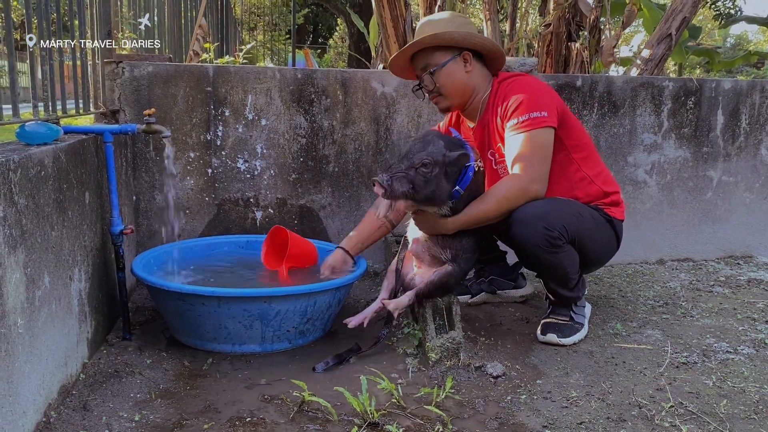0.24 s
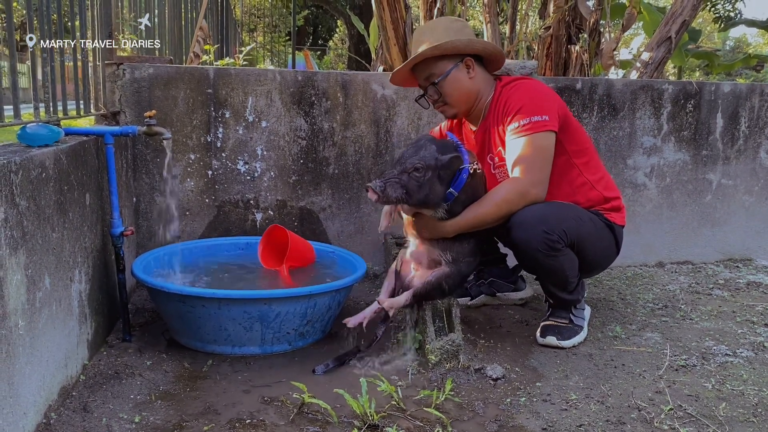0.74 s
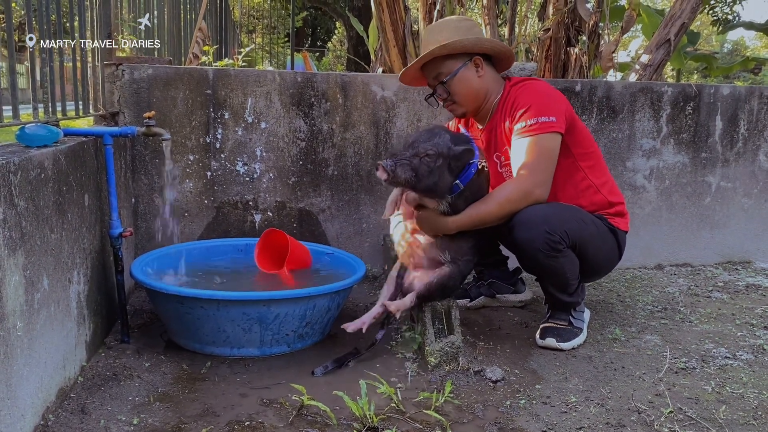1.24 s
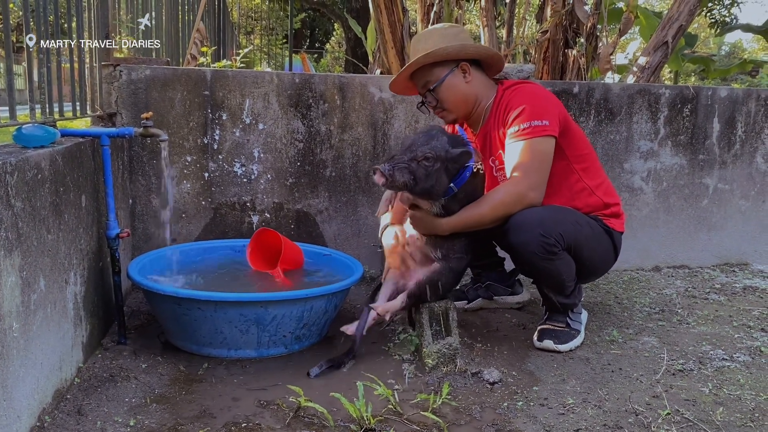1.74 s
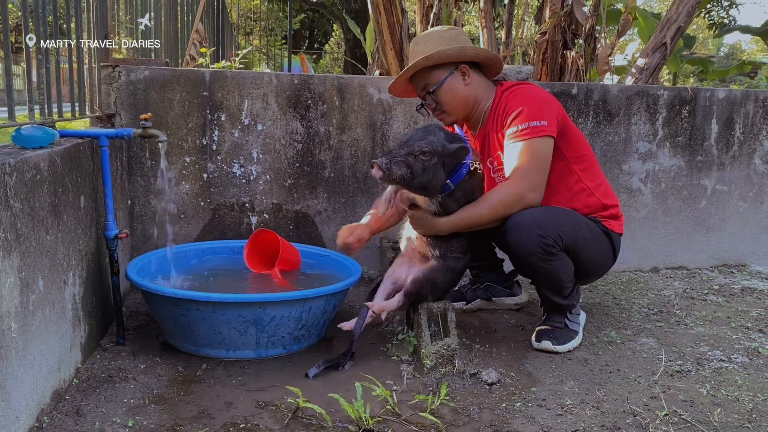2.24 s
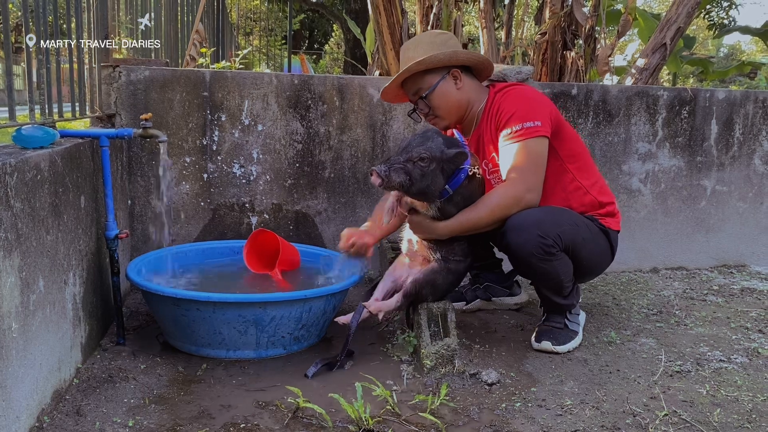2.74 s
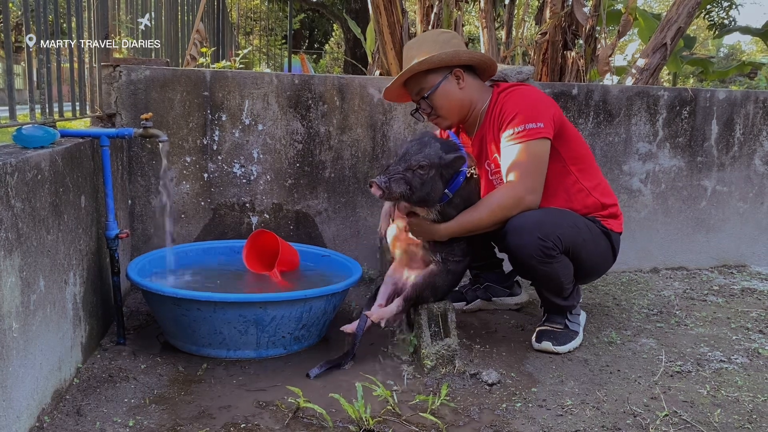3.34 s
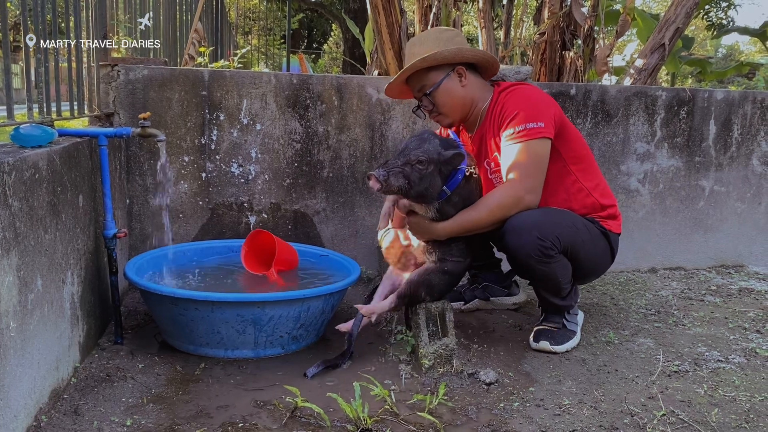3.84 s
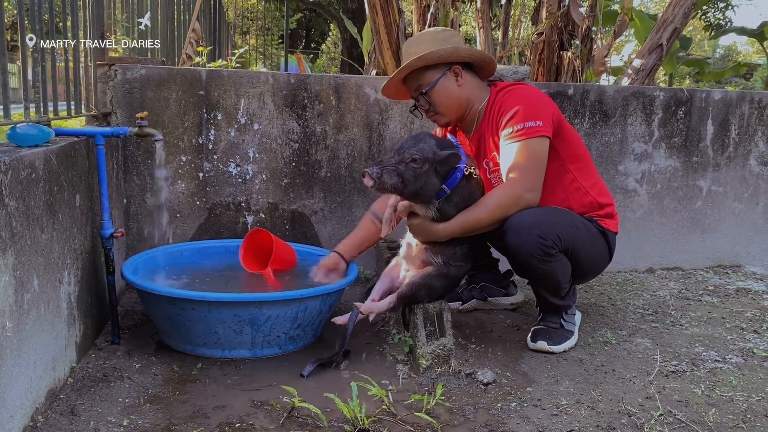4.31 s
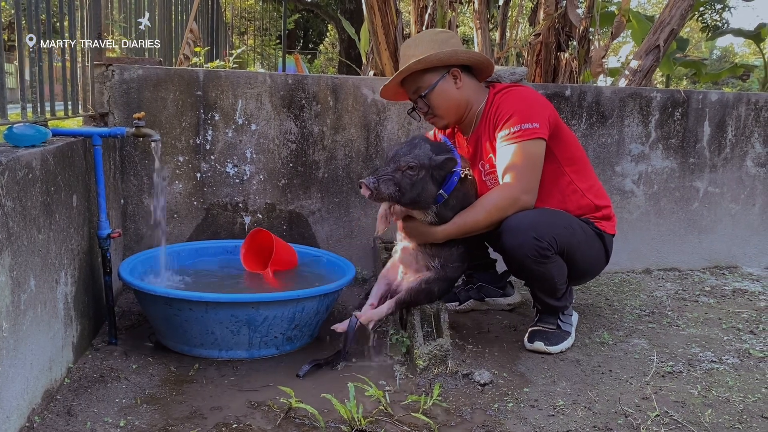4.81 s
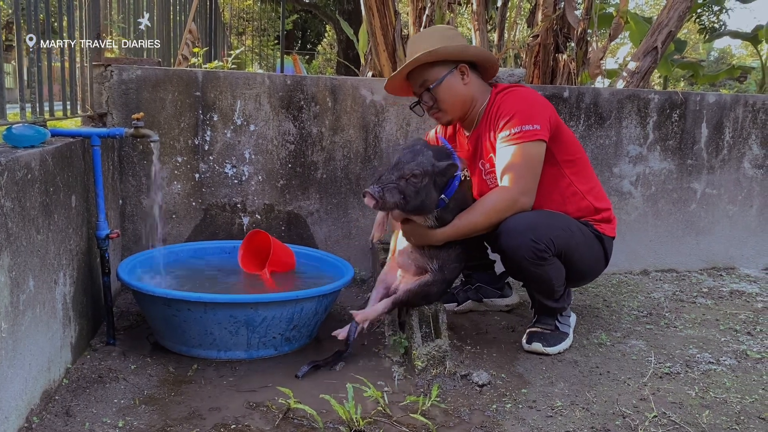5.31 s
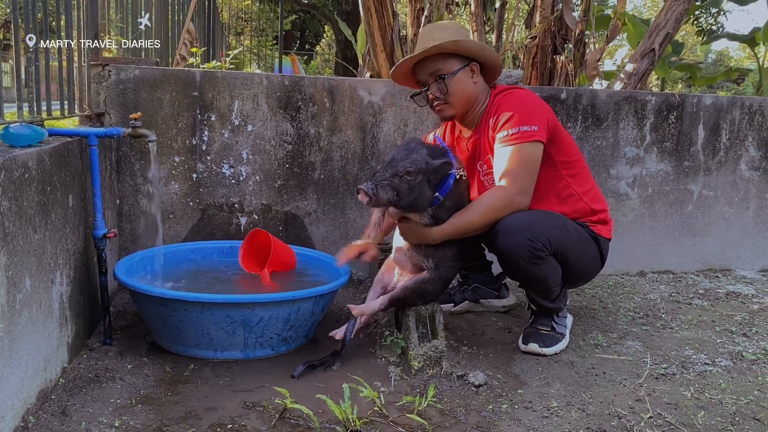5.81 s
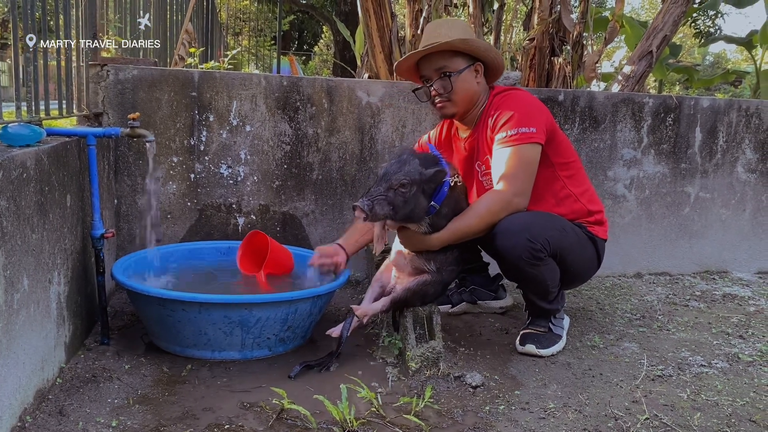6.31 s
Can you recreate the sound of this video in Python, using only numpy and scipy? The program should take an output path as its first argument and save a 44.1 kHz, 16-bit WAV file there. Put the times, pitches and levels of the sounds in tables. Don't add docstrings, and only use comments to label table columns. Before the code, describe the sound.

Shrill, fluttering piglet cries rise, crack and sink over running tap water, wet splashes and bubbling plops, with faint traffic rumbling behind.

```python
import sys
import numpy as np
from scipy import signal
from scipy.fft import rfft, irfft, next_fast_len
from scipy.io import wavfile
from scipy.ndimage import uniform_filter1d, map_coordinates

SR = 44100
rng = np.random.default_rng(int(sys.argv[2]) if len(sys.argv) > 2 else 0)


def dump(signal):
    limited = np.clip(np.atleast_2d(signal).T, -1, 1)
    pcm = np.round(limited * 32767).astype(np.int16)
    wavfile.write(sys.argv[1], SR, pcm)


def how_loud(loudness_db):
    steps = np.asarray(loudness_db, float) / 20
    return 10 ** steps


N = 289296
CLOCK = np.arange(N) / SR


def unit(x):
    return x / np.sqrt(np.mean(x ** 2) + 1e-20)


def noise():
    return rng.standard_normal(N)


def along(points, hz):
    f, v = np.transpose(points)
    return np.interp(np.log(hz + 1), np.log(f + 1), v)


def curves(rows):
    s, *columns = np.transpose(rows)
    return [np.interp(CLOCK, s, column) for column in columns]


def wobble(rate):
    return map_coordinates(rng.standard_normal(int(N * rate / SR) + 4), [np.arange(N) * rate / SR])


def between(start, end, edge_s):
    return np.clip(np.minimum(CLOCK - start, end - CLOCK) / edge_s, 0, 1)


def filtered(x, response):
    m = next_fast_len(N + SR // 2)
    return irfft(rfft(x, m) * response(np.fft.rfftfreq(m, 1 / SR)), m)[..., :N]


def resonance(hz, centre, width):
    return 1j * hz * width / (centre * centre - hz * hz + 1j * hz * width)


def resonant(x, modes):
    def response(hz):
        return sum((-1) ** k * how_loud(db) * resonance(hz, centre, width)
                   for k, (centre, width, db) in enumerate(modes))
    return filtered(x, response)


def effort():
    # (time [s], pitch [Hz], whistle [dB], throat rasp [dB], fold pressing [dB])
    fading = [(0.0, 1440, -37, -32, 3), (0.04, 1330, -32.5, -46.5, 0.5), (0.065, 1255, -29.5, -37, -2),
              (0.125, 1190, -39.5, -38, -5), (0.165, 1150, -54, -33.5, -20), (0.25, 1140, -52, -44, -15),
              (0.335, 1140, -49, -35, -16)]
    revived = [(0.37, 1190, -35.5, -39.5, -2.5), (0.424, 1295, -31, -39, 0.5), (0.452, 1147, -47, -36, -6),
               (0.491, 1080, -48, -34, 4), (0.51, 1100, -73, -44.5, -4), (0.584, 1186, -65, -38.5, -6),
               (0.61, 1184, -58, -53.5, -9), (0.66, 1189, -59, -51, -9)]
    onset = [(1.05, 1145, -75, -54, -14), (1.138, 1150, -58, -59.5, -10), (1.162, 1223, -43.5, -49, 1),
             (1.185, 1557, -30, -42, -10)]
    held = [(1.21, 1684, -21, -46, -15), (1.29, 1722, -19, -43.5, -13), (1.326, 1642, -23.5, -41, -13),
            (1.345, 1736, -19, -45, -8), (1.53, 1846, -22, -51, -4), (1.58, 1768, -21.5, -43, -1.5),
            (1.71, 1844, -21, -41.5, -6), (1.852, 1806, -20.5, -43.5, -6.5)]
    strained = [(1.988, 1800, -21.5, -40.5, -5.5), (2.131, 1750, -23.5, -38.5, -1.5),
                (2.25, 1790, -23.5, -40.5, -3), (2.351, 1677, -24.5, -38, 1), (2.449, 1575, -25, -40, -2.5)]
    sinking = [(2.6, 1500, -26.5, -40, -2.5), (2.69, 1398, -30.5, -36.5, -2.5), (2.751, 1240, -34, -39, 5),
               (2.83, 899, -52, -39.5, 7), (2.955, 1011, -44, -40, 7.5), (2.974, 1217, -38, -44, 5.5)]
    renewed = [(3.0, 1380, -26, -34, -2.5), (3.07, 1406, -28.5, -33, -1), (3.116, 1340, -28, -36, -3),
               (3.164, 1428, -28.5, -31.5, 1.5), (3.249, 1340, -28.5, -38.5, -1.5),
               (3.286, 1369, -24.5, -32.5, -2), (3.306, 1264, -30.5, -36, -1),
               (3.385, 1159, -39.5, -37, 8.5)]
    hoarse = [(3.4, 1077, -36, -30.5, -4), (3.43, 1169, -36, -34.5, 6.5), (3.5, 1257, -29, -36, -3),
              (3.549, 1204, -38, -34.5, -1.5), (3.69, 1199, -32, -37, 3), (3.739, 1182, -53, -37, -4),
              (3.799, 1175, -45, -38.5, -26)]
    rising = [(4.36, 1133, -65, -53, 6), (4.51, 1128, -55.5, -47, -17), (4.545, 1150, -49, -39.5, -10),
              (4.56, 1135, -37, -41, -4), (4.6, 1102, -40.5, -47, 2.5), (4.7, 1109, -44, -47.5, -1.5)]
    swelling = [(4.723, 1335, -32, -39, -15), (4.8, 1386, -22, -38, -10), (4.9, 1496, -20, -35, -5.5),
                (5.001, 1517, -23, -36, -3), (5.101, 1499, -23.5, -38, -2.5),
                (5.2, 1393, -24.5, -33.5, -7.5), (5.252, 1298, -25, -34.5, -4.5)]
    wavering = [(5.302, 1461, -20, -31, -4.5), (5.468, 1796, -19.5, -35, -7.5),
                (5.562, 1678, -23, -34.5, -7.5), (5.575, 1489, -20, -32, -6),
                (5.652, 1364, -20.5, -32.5, -4.5), (5.728, 1638, -18, -30.5, -7),
                (5.792, 1474, -22, -32, -1), (5.865, 1748, -18, -38.5, -7.5), (5.94, 1670, -22.5, -32, -8)]
    dying = [(5.958, 1429, -22, -32.5, -6), (6.06, 1238, -29, -34.5, 0.5), (6.103, 866, -45.5, -31, 6),
             (6.16, 850, -47, -71, -16)]
    # (start [s], end [s])
    breaths = [
        (-1, .64),
        (1.055, 3.835),
        (4.36, 6.15),
    ]
    phrases = (fading + revived + onset + held + strained + sinking
               + renewed + hoarse + rising + swelling + wavering + dying)
    pitch, whistle_db, rasp_db, pressing_db = curves(phrases)
    voiced = sum(between(start, end, edge_s=.03) for start, end in breaths)
    octave_db = whistle_db + pressing_db
    break_db = -28.5
    swell_db = np.clip(0.43 * (break_db - whistle_db), 0, 6)
    grunt_db = np.minimum(-50.5 + swell_db, rasp_db + 6)
    spent_s = sum((CLOCK - max(start, 0)) * (CLOCK > start) * (CLOCK < end) for start, end in breaths)
    hiss_db = -31 + 0.82 * (whistle_db - break_db) - 2 * np.log2(pitch / 1500) - 3.5 * spent_s
    hiss_db = hiss_db + sum(-8 * np.exp(-abs(CLOCK - start) / 0.081) for start, end in breaths)
    return voiced, pitch, whistle_db, octave_db, grunt_db, rasp_db, hiss_db


def each_puff(turns):
    return map_coordinates(rng.standard_normal(800), [turns - .5], order=2, mode="nearest")


def flutter():
    # (time [s], rate [1/s], closing [0-1], pitch unsteadiness [share])
    flaps = [(0, 91, .7, .018), (.24, 94, .95, .04), (.42, 92, .8, .025), (.6, 84, .97, .04),
             (1.3, 92.5, .95, .022), (2.28, 93.7, .97, .028), (2.44, 87, .97, .045), (2.8, 87, .93, .04),
             (3.02, 94, .9, .025), (3.3, 93.3, .8, .02), (3.45, 96, .65, .022), (3.8, 100, .7, .035),
             (4.4, 76, .93, .04), (4.58, 88, .9, .03), (4.75, 89, .82, .03), (4.95, 90, .62, .03),
             (5.3, 89, .65, .032), (5.45, 92.8, .85, .035), (5.63, 90, .68, .035), (5.88, 91, .7, .045),
             (6.0, 91, .7, .028), (6.2, 91, .65, .025)]
    rate, closing, unsteady = curves(flaps)
    turns = np.cumsum(rate * (1 + .03 * wobble(45))) / SR
    opening = .5 - .5 * np.cos(2 * np.pi * turns)
    opening = .5 - .5 * np.cos(2 * np.pi * (turns + .04 * opening))
    size = how_loud(closing ** 2 * (1.4 * each_puff(turns) + 1.6 * wobble(42)))
    return turns, opening, closing, unsteady, size


def vocal_folds(pitch, turns, opening, unsteady):
    # (start [s], end [s], second strand's share of power [0-1])
    splits = [
        (1.98, 2.3, .25),
        (2.28, 2.64, .55),
        (4.46, 4.57, .5),
        (4.7, 5.19, .4),
        (5.56, 5.65, .3),
        (5.69, 5.85, .3),
        (5.93, 6.03, .25),
    ]
    mouth_hz = [2980, 3510, 4930, 5510, 7440]
    lean, reach_hz, lock_hz = .8, 300, 1721
    share = sum(part * between(start, end, edge_s=.04) for start, end, part in splits)
    sweep = .03 * np.sin(2 * np.pi * turns) + .02 * (opening - .8)

    def shaken(hz):
        return hz * (1 + sweep + unsteady * (.55 * each_puff(turns) + 0.297 * wobble(400)))

    free_hz = shaken(pitch)
    locked = 2 * np.pi * np.cumsum(shaken(lock_hz)) / SR

    def partial(k):
        hz = k * free_hz
        pull = sum((note - hz) * np.exp(-((note - hz) / reach_hz) ** 2) for note in mouth_hz)
        free = np.sin(2 * np.pi * np.cumsum(hz + lean * pull) / SR)
        return np.sqrt(1 - share) * free + np.sqrt(share) * .75 ** (k - 1) * np.sin(k * locked)
    return partial


def piglet():
    # (centre [Hz], width [Hz], level [dB])
    palate = [(850, 91, 4.5), (1215, 160, 2.5), (1845, 410, -1.5), (2423, 650, 2), (2978, 314, 5),
              (3630, 336, 1.5), (5120, 760, -8.5), (5474, 320, -10), (6420, 360, -15), (7540, 270, -11.5)]
    chest = [(235, 47, -17), (836, 74, -1), (1040, 1600, -20.5)]
    throat = [(1181, 125, 11), (1890, 366, 11.5), (2290, 177, 11), (2986, 190, 15), (3667, 53, 12.5),
              (4085, 210, 14.5), (4970, 1760, -3.5)]
    snout = [(4670, 480, 6.5), (5050, 164, 10.5), (5490, 75, 10), (6136, 68, 6.5), (6550, 89, 6),
             (7346, 370, 9), (8260, 870, 10.5), (8960, 1150, 9), (10820, 740, 1), (13500, 2700, -10.5)]
    # (multiple of pitch, level against the octave [dB])
    overtones = [(3, -0.5), (4, 2), (5, -0.5), (6, -26)]
    # (multiple of flutter rate, level [dB])
    chest_tone = [(1, -48.5), (2, -56.5), (3, -62.5)]
    # (time [s], hiss [dB], third partial [dB])
    breathy = [(0, -1, 0), (.2, -1, -3), (.4, 0, -2), (.6, 0, 0), (1.15, 5.5, -3), (1.3, -3, 11),
               (1.45, -1, -22), (2, 0, -1), (2.4, 4, -8), (2.8, 0.5, 12), (3.1, 3, -3), (3.5, 0, 8),
               (3.8, -2, 10), (4.5, 5, 13), (4.7, 7.5, 8), (4.75, 3.5, 5), (5.1, -0.5, 2), (5.6, 3, 13.5),
               (6.1, -0.5, -8)]
    # (centre [Hz], width [Hz], depth [0-1]); the one near 9 kHz only deepens
    thinned_bands = [(2180, 100, .35), (2600, 160, .35), (3230, 90, .35), (4230, 480, .95), (8950, 500, .4)]
    voiced, pitch, whistle_db, octave_db, grunt_db, rasp_db, hiss_db = effort()
    turns, opening, closing, unsteady, size = flutter()
    breathy_db, third_db = curves(breathy)

    def puff(sharp):
        evened = 1 - closing + closing * .55 / sharp ** .25
        return size * (1 - closing + closing * opening ** sharp) / evened

    def gusts(sharp):
        return puff(sharp) * noise()

    partial = vocal_folds(pitch, turns, opening, unsteady)
    odd = how_loud(-15.5) * partial(3) + how_loud(-39) * partial(5)
    whistle = puff(sharp=1.8) * how_loud(whistle_db + 3) * (partial(1) + how_loud(third_db) * odd)
    upper = partial(2) + sum(how_loud(db) * partial(k) for k, db in overtones)
    whistle = whistle + .98 * puff(sharp=1.2) * how_loud(octave_db + 2 + 1.5 * wobble(60)) * upper

    slap = unit(size * closing * np.diff(np.floor(turns - .4), prepend=0))
    grunt = unit(resonant(0.098 * slap + unit(gusts(sharp=1.25)), chest))
    rasp = unit(resonant(.25 * slap + unit(gusts(sharp=2.5)), throat))
    spurts = unit(how_loud(2.74 * each_puff(turns)) * gusts(sharp=1.5))
    hiss = unit(resonant(0.14 * slap + spurts, snout))
    hum = sum(how_loud(db + 3.2 * wobble(11.0)) * np.sin(2 * np.pi * k * turns) for k, db in chest_tone)

    cry = how_loud(2.5) * resonant(whistle, palate) + hum
    cry = cry + how_loud(grunt_db + 1.0) * grunt + how_loud(rasp_db + 8) * rasp
    cry = cry + how_loud(hiss_db + breathy_db - 1.5 + 1.6 * wobble(40)) * hiss

    def thinned(hz):
        return np.prod([(1 - depth * resonance(hz, centre, width)) ** 2 for centre, width, depth in thinned_bands],
                       axis=0)
    return voiced * filtered(cry, thinned)


def add(out, s, piece):
    out[round(s * SR):][:len(piece)] += piece


def bubble(hz, cycles, rise):
    u = np.arange(int(3 * cycles * SR / hz)) * hz / SR / cycles
    ringing = np.sin(2 * np.pi * cycles * (u + rise * u * u / 2))
    return ringing * np.exp(-1.6 * u) * (1 - np.exp(-12 * u))


def stream():
    # (frequency [Hz], density [dB per Hz])
    colour = [(150, -7.5), (250, -1), (1080, -6), (4340, -5.5), (7700, -12), (8850, -3), (11100, -15),
              (12300, -4), (13200, -40), (13900, -4), (16000, -32)]
    # (time [s], dies away in [s], level over the stream [dB])
    runoff = [
        (.6, 0.18, 10),
        (3.841, 0.089, 0),
        (4.25, 0.24, 1.5),
        (6.12, 0.18, 8),
    ]
    rush = unit(filtered(noise(), lambda hz: how_loud(along(colour, hz))))
    runoff_db = sum(db * (CLOCK > s) * np.exp(-(abs(CLOCK - s) / dies_s) ** 2) for s, dies_s, db in runoff)
    return how_loud(-52 + runoff_db + 1.5 * wobble(3) + 3.5 * wobble(45)) * rush


def bubbles():
    # (time [s], peak [dB], pitch [Hz])
    plops = [(0.615, -34.5, 254), (0.858, -35, 410), (0.874, -35.5, 380), (1.415, -37, 513),
             (1.623, -41, 417.5), (1.72, -38, 523), (1.817, -34, 539), (2.532, -50, 249.4),
             (2.559, -32.5, 541.2), (2.913, -41, 397.3), (3.38, -45, 494), (3.656, -41, 275.5),
             (3.765, -35, 243), (3.904, -43.5, 497), (4.109, -43, 247), (4.231, -32.5, 398),
             (4.303, -32.5, 435), (4.756, -42, 390), (5.358, -35.5, 418.7), (5.475, -32, 397.1),
             (5.888, -29.5, 435.4), (5.956, -36.5, 365)]
    # (time [s], peak [dB], pitch [Hz])
    plinks = [(0.722, -28, 3200), (0.732, -26.5, 2800), (0.789, -35, 2000), (.705, -38, 1800),
              (0.883, -40, 824), (0.922, -41, 1790), (3.93, -38, 1420), (3.977, -36, 3460),
              (4.047, -39, 2230), (4.149, -36, 1330), (4.172, -34, 764), (4.209, -35, 2370),
              (4.278, -30, 1860), (4.163, -30.5, 2550), (4.2995, -17.5, 1956), (4.302, -23, 2270),
              (4.363, -27.5, 2180), (6.361, -29, 1930), (6.483, -40, 790), (6.501, -23.5, 3900),
              (6.514, -39.5, 760), (6.549, -32, 3480)]
    out = np.zeros(N + SR)
    for when, spread, strength in rng.random((400, 3)):
        tiny = bubble(450 * 12 ** spread, cycles=4.6, rise=0.4)
        add(out, when * N / SR, how_loud(-62 + 17 * strength + 13 * spread) * tiny)
    for s, db, hz in plops:
        add(out, s, how_loud(db + 2) * bubble(hz, cycles=4.5, rise=.35))
    for s, db, hz in plinks:
        add(out, s, how_loud(db) * bubble(hz, cycles=7, rise=.08))
    return out[:N]


def splashes():
    # (time [s], peak [dB])
    bursts = [(0.706, -37), (0.7473, -35), (0.772, -33), (0.797, -39), (0.8583, -34.5), (0.9001, -35),
              (0.931, -46), (0.956, -36.5), (0.9809, -42), (1.0154, -41), (1.0713, -47), (1.0994, -43),
              (3.8677, -33.5), (3.9171, -35), (3.9894, -45), (4.0056, -32.5), (4.045, -41), (4.0574, -35),
              (4.1051, -47), (4.124, -37.5), (4.162, -41), (4.171, -35), (4.19, -40), (4.2267, -32.5),
              (4.271, -34), (4.295, -29.5), (4.3106, -31), (4.3526, -31.5), (4.398, -44), (4.4246, -33),
              (4.4605, -36), (6.1597, -30.5), (6.253, -33), (6.3413, -40), (6.3587, -30.5), (6.404, -36),
              (6.465, -34), (6.5397, -36)]
    spray, t = np.zeros(N + SR), np.arange(SR // 20) / SR
    for s, db in bursts:
        shape = how_loud(db - 10.5 - 60 * t / .035) * 2 * (1 - np.exp(-t / .003))
        add(spray, s, shape * rng.standard_normal(len(t)))
    for when, strength in rng.random((220, 2)):
        shape = how_loud(-51 + 6 * strength ** 3 - 60 * t / .02)
        add(spray, when * N / SR, shape * rng.standard_normal(len(t)))
    return resonant(spray[:N], [(4220, 1100, 18.1), (9600, 25000, 0.94)])


def basin():
    return stream() + bubbles() + splashes()


def traffic():
    # (frequency [Hz], density [dB per Hz])
    rumble = [(15, -43), (25, -28), (54, 3.5), (135, -1.5), (193, -5.5), (249, -0.5), (350, -15),
              (460, -27), (770, -120)]
    pass_s, pass_wide_s = 5.37, 0.75
    passing = np.exp(-((CLOCK - pass_s) / pass_wide_s) ** 2)
    level_db = -53.5 + 5 * passing + .7 * wobble(1.6) + 1.4 * wobble(24)
    return how_loud(level_db) * unit(filtered(noise(), lambda hz: how_loud(along(rumble, hz))))


def heaves():
    # (time [s], half length [s], level [dB])
    thuds = [
        (0.615, 0.049, -48.5),
        (1.078, 0.017, -47.5),
        (2.756, 0.26, -53.5),
        (3.792, 0.08, -44.5),
        (6.13, .06, -44),
    ]
    # (centre [Hz], width [Hz], level [dB])
    ribs = [(95, 40, 0), (194, 200, -9)]
    swell = sum(how_loud(db) * np.exp(-((CLOCK - s) / half_s) ** 2) for s, half_s, db in thuds)
    return swell * unit(resonant(noise(), ribs))


def yard(x):
    # (delay [s], level [dB])
    walls = [(.0052, -11.5), (.0079, -30.5), (0.013, -23.5), (.019, -21)]
    # (frequency [Hz], time to fall 60 dB [s])
    decay = [(300, 0.51), (2000, 0.52), (10000, 0.011)]
    near = filtered(x, lambda hz: 1 + sum(how_loud(db) * np.exp(-2j * np.pi * hz * s) for s, db in walls))
    hz, t, z = signal.stft(rng.standard_normal(SR // 2), SR, nperseg=256)
    tail = signal.istft(z * how_loud(-60 * t / along(decay, hz)[:, None]), SR, nperseg=256)[1]
    late = np.pad(x, (400, 0))
    return near + how_loud(-20.5) * signal.fftconvolve(late, tail / np.linalg.norm(tail))[:N]


def scene():
    return np.tile(yard(piglet() + basin() + heaves()) + traffic(), (2, 1))


def roll_off(x):
    return signal.sosfilt(signal.butter(12, 16790, fs=SR, output="sos"), x)


def record(dry):
    # (frequency [Hz], left-right likeness [0-1])
    alike = [(60, .993), (250, .99), (700, .92), (4000, .88), (5600, .4), (6300, .99), (7500, .97),
             (8000, .75), (8600, .99), (9500, .97), (10000, .65), (10600, .99), (11700, .98), (12200, .6),
             (12600, .93)]
    # (frequency [Hz], left minus right [dB])
    tilt = [(500, 0), (800, 3.5), (1100, -2), (1600, 1), (2400, -.5), (3400, 2), (4000, 1), (5200, 3.5),
            (6000, 1.5), (8500, 0)]
    # (frequency [Hz], left leads by [radians])
    lead = [(50, 0), (900, .45), (1400, .7), (4000, .8), (5000, 1.3), (5500, 1.3), (5900, 0), (7300, 0),
            (8700, -3.14), (9350, -3.14), (10600, -6.28), (11700, -6.28), (12600, -9.42), (13900, -9.42),
            (14600, -12.57)]
    side = np.array([[1], [-1]])
    z = signal.stft(dry[0], nperseg=256)[2]
    drift = rng.standard_normal(z.shape) + 1j * rng.standard_normal(z.shape)
    drift = uniform_filter1d(drift, size=3, axis=1)
    scattered = signal.istft(z * drift / abs(drift), nperseg=256)[1][:N]

    def turn(hz):
        return np.arccos(np.clip(along(alike, hz), -1, 1)) / 2

    def port(hz):
        gain = how_loud(side * along(tilt, hz) / 2)
        return gain * np.exp(.5j * side * along(lead, hz)) * (hz < 15830)

    ports = filtered(dry, lambda hz: np.cos(turn(hz)))
    ports = ports + side * filtered(scattered, lambda hz: np.sin(turn(hz)))
    ports = filtered(ports, port)
    top, knee = .62, 3
    ports = ports / (1 + abs(ports / top) ** knee) ** (1 / knee)
    return roll_off(ports)


dry = scene()
out = record(dry)
dump(out)
```